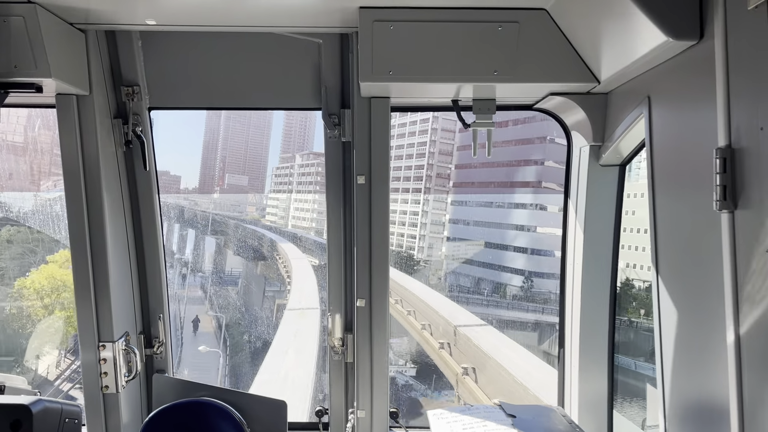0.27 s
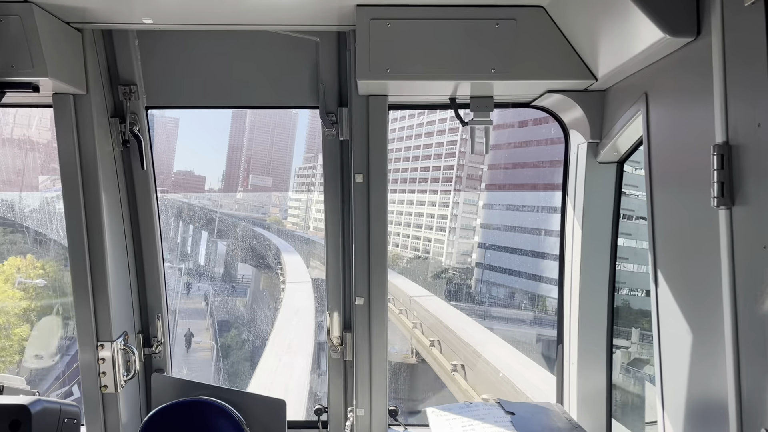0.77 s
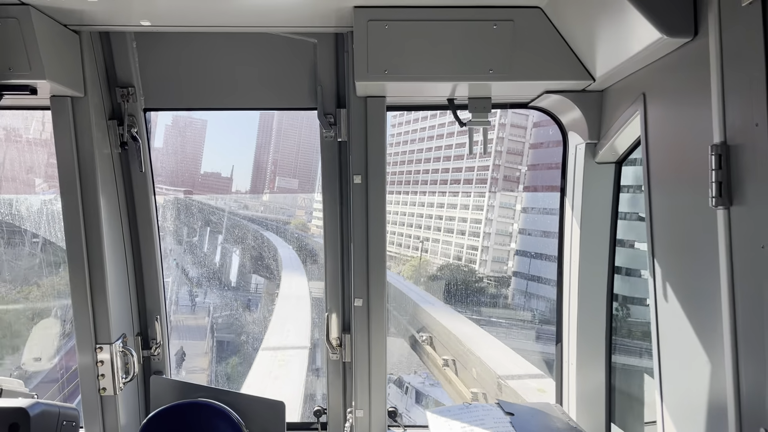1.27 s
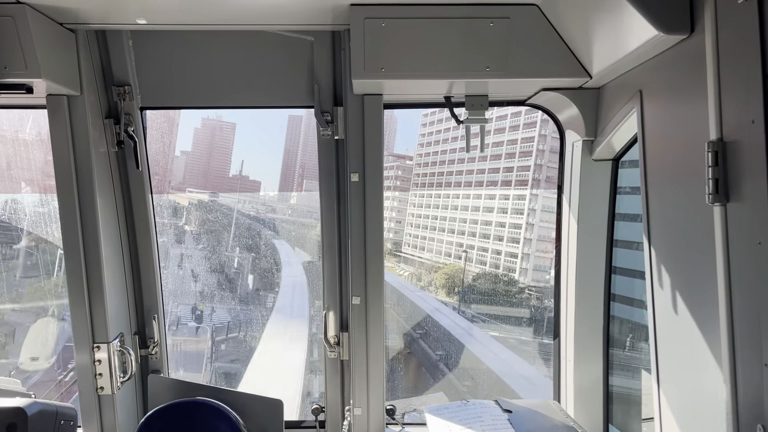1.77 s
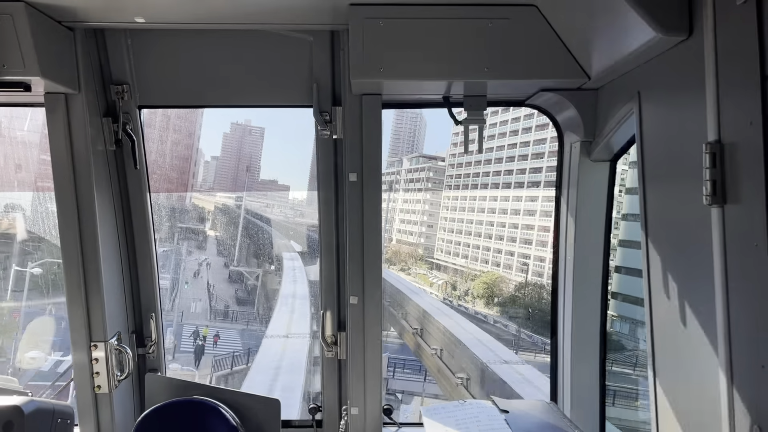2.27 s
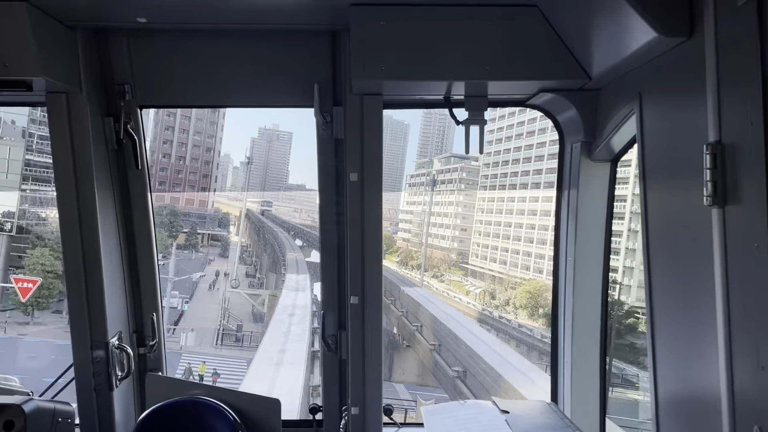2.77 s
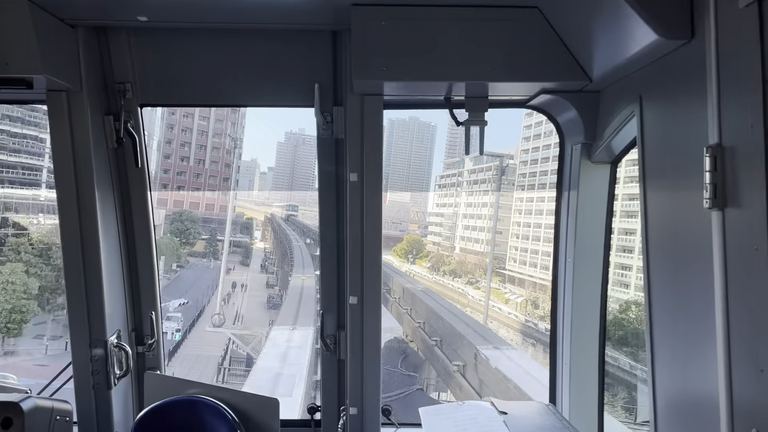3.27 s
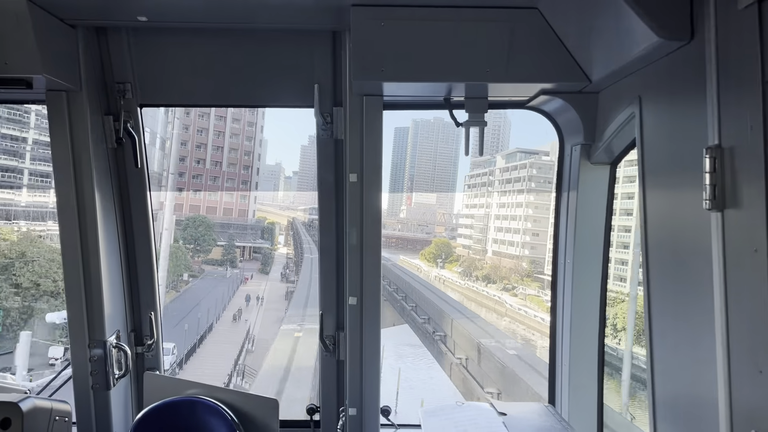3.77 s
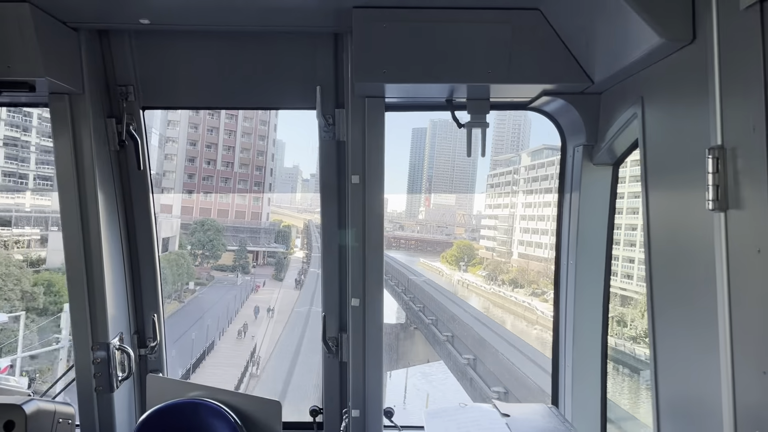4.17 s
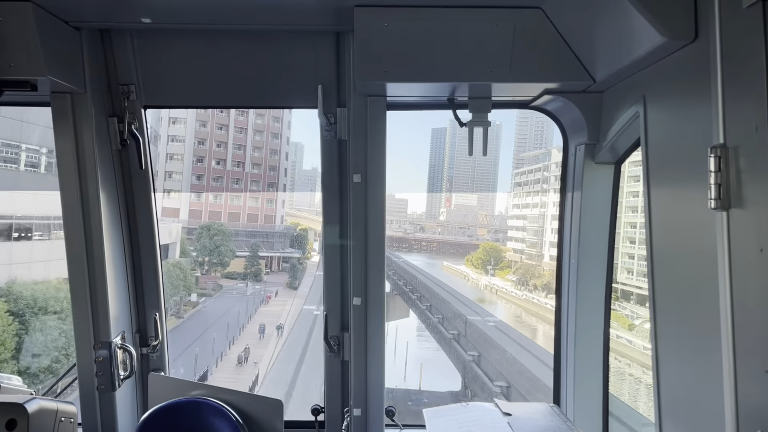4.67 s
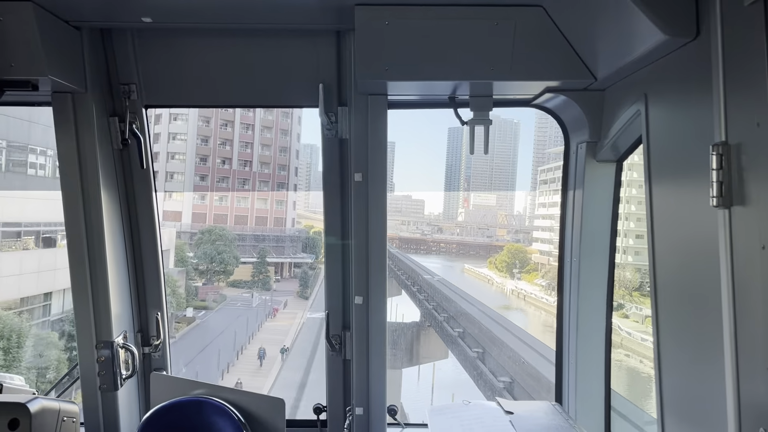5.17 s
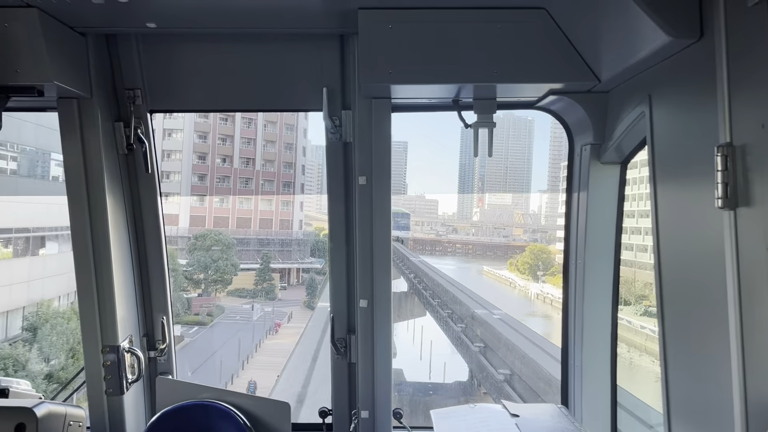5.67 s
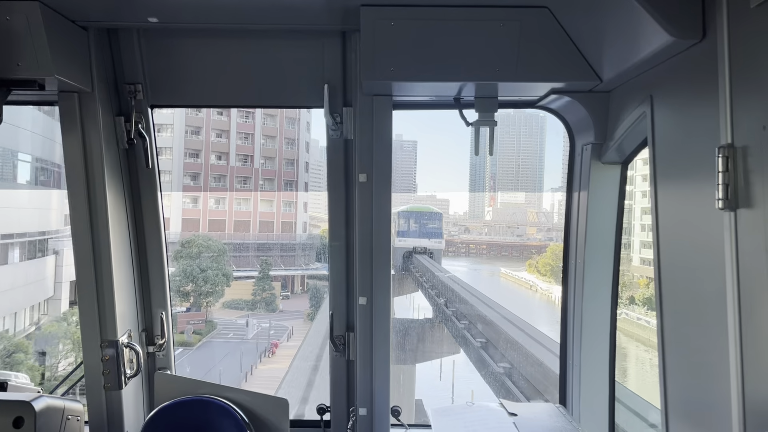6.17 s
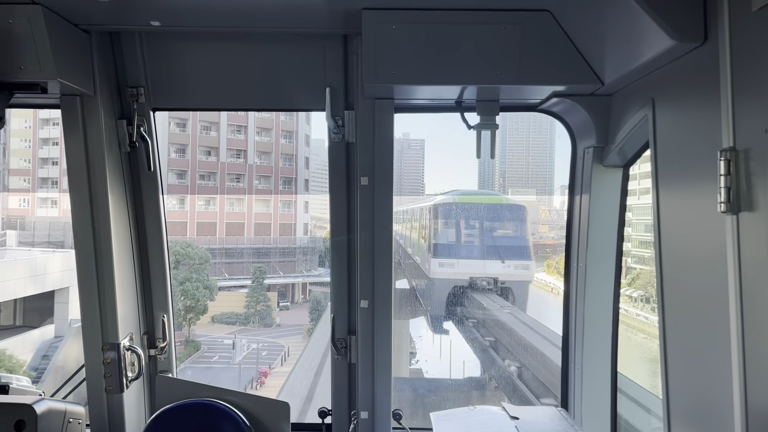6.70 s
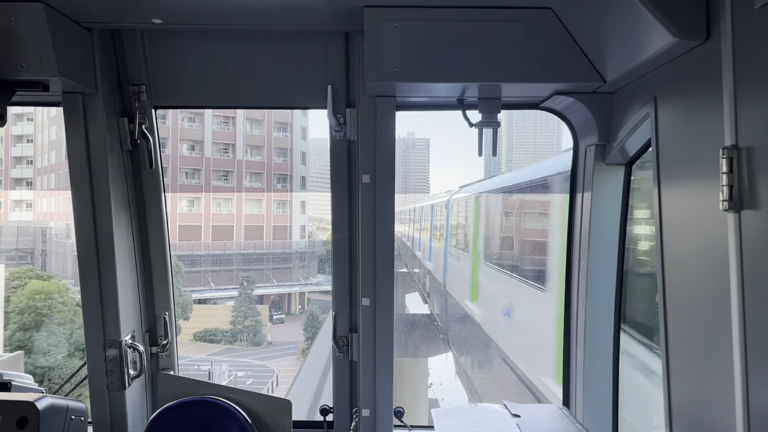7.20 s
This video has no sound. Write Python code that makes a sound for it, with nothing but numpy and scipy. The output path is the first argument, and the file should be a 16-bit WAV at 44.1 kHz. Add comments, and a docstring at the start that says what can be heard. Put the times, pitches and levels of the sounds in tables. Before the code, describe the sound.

Inside the front cab of a monorail, a deep throbbing hum and tyre rumble continue while a loose door knocks and small fittings tick.

```python
"""Inside the front of a monorail car running along its elevated beam.
The body hums and throbs near 85 Hz (phase-wandering tone plus tyre orders) over shaped-noise rumble and roar.
The tyres slap across a beam joint about once a second and roar more from halfway on, on coarser concrete.
Jolts bump the wall panels (short decaying sines) and make a loose cab door rattle and knock (ringing modes).
Small fittings tick (noise grains) and trim squeaks (gliding sines)."""
import sys
import numpy as np
from scipy import signal
from scipy.fft import rfft, irfft
from scipy.io import wavfile

SR = 44100
rng = np.random.default_rng(int(sys.argv[2]) if len(sys.argv) > 2 else 0)


def wav_out(sig):
    """Save sig, one row per channel (or a flat mono array), as 16-bit PCM at SR to the path in sys.argv[1]."""
    wavfile.write(sys.argv[1], SR, np.round(np.clip(np.atleast_2d(sig).T, -1, 1) * 32767).astype(np.int16))


N = 328104
TIME, BINS = np.arange(N) / SR, np.fft.rfftfreq(N, 1 / SR)  # s, Hz

# Tyre roar spectrum, also tilting the faint panel bumps. Each row: frequency in Hz, relative level in dB.
ROAR_SPECTRUM = [(120, -20.5), (200, 2.5), (300, -2.5), (380, -4.5), (440, -7), (600, -3.5), (760, -10),
                 (880, -16.5), (1200, -27.5), (1600, -31.5), (2200, -35.5), (4000, -63)]
# Spectrum of small loose parts: latch and fittings. Each row: frequency in Hz, relative level in dB.
RATTLE_SPECTRUM = [(400, -7), (800, 10), (2000, 16.5), (3000, 7), (4500, 3), (6500, 4), (9000, 2.5),
                   (10500, -0.5), (12500, -21.5), (14000, -36)]
# Tyres on beam joints. Each row: time in seconds, slap level in dB, undercarriage shake level in dB.
BEAM_JOINTS = [(0.027, -31, -23.5), (1.083, -33.5, -21), (1.856, -35, -25.5), (2.901, -29, -25.5),
               (3.936, -29.5, -19.5), (4.454, -29, -22), (5.49, -32.5, -25.5), (6.549, -35.5, -25)]


def amp(db):
    """Decibels to gain."""
    return 10 ** (np.asarray(db) / 20)


def unit(x):
    """Scales to rms 1."""
    return x / np.sqrt(np.mean(x ** 2) + 1e-20)


def curve(rows, column):
    """One column of a time table at every sample."""
    rows = np.array(rows)
    return np.interp(TIME, rows[:, 0], rows[:, column])


def shape(rows, hz, column=1):
    """One column of a frequency table, joined on a log axis."""
    rows = np.array(rows)
    return np.interp(np.log(hz + 1), np.log(rows[:, 0] + 1), rows[:, column])


def noise(db):
    """Two unrelated noises of one spectrum: the direct and the diffuse sound."""
    spectra = rfft(rng.standard_normal((2, N))) * amp(db)
    return unit(irfft(spectra, N))


def drift(rate_hz):
    """Slow random wander of rms 1, low-passed near rate_hz."""
    spectrum = rfft(rng.standard_normal(N))
    return unit(irfft(spectrum / (1 + (BINS / rate_hz) ** 4), N))


def burst(start_s, rise_s, decay_s, hold_s=0):
    """An envelope that swells from start_s, may hold, and dies away."""
    age = np.maximum(TIME - start_s, 0)
    fall = np.exp(-np.clip((age - rise_s - hold_s) / decay_s, 0, 20))
    return np.minimum(age / rise_s, 1) * fall


def add(mix, start_s, sound):
    """Mixes a sound in at start_s."""
    part = mix[..., max(round(start_s * SR), 0):][..., :sound.shape[-1]]
    part += sound[..., :part.shape[-1]]


def cabin(x, wet_db, t60_s):
    """Direct and diffuse sound: the small cab adds a short tail of reflections."""
    t = np.arange(SR // 4) / SR
    tails = rng.standard_normal((2, len(t))) * amp(-60 * t / t60_s) * (t > .004)
    tails /= np.linalg.norm(tails[0])
    wet = signal.oaconvolve(x[None], tails, axes=1)[:, :N]
    return np.array([x + amp(wet_db) * wet[0], amp(-11.0) * wet[1]])


def coarse():
    """0 on the smooth concrete, 1 on the coarse."""
    from_s, over_s = 3.78, 0.65
    return np.clip((TIME - from_s) / over_s, 0, 1)


def roughness_db():
    """How hard the concrete drives the tyres."""
    # Surges and lulls. Each row: time in seconds, level change in dB.
    surges = [(0, 3), (.2, 1.5), (.33, 0.5), (1.5, 1), (2.1, 2), (2.83, -0.5), (2.95, 0.5), (3.7, 2),
              (4.3, 0.5), (5.45, 0), (5.77, -1), (6.3, 1), (7.43, 0)]
    coarse_change_db = 4.5
    return coarse_change_db * coarse() + curve(surges, 1)


def boom():
    """Turning tyres drive the body's low mode at one multiple of their rate; nearby multiples make it throb."""
    # Drone of the body mode. Each row: time in seconds, level in dB.
    drone_levels = [(0.0, -17), (0.1, -11), (0.56, -16.5), (0.62, -26), (0.7, -10), (0.93, -16),
                    (0.99, -24), (1.18, -11.5), (1.57, -15), (1.63, -23.5), (1.76, -16), (1.96, -19),
                    (2.03, -10.5), (2.19, -28.5), (2.4, -19.5), (2.56, -23), (2.65, -16.5), (3.06, -21.5),
                    (3.12, -14.5), (3.31, -21), (3.47, -11), (3.54, -28), (3.66, -12.5), (3.85, -13.5),
                    (3.97, -20.5), (4.39, -17), (4.47, -26.5), (4.76, -18.5), (4.8, -32.5), (4.92, -13.5),
                    (5.03, -20), (5.21, -17.5), (5.34, -34.5), (5.44, -11.5), (5.98, -13), (6.06, -24.5),
                    (6.13, -13), (6.97, -10), (7.14, -27.5), (7.2, -11), (7.33, -11), (7.43, -15)]
    # Weaker multiples of the turning rate. Each row: multiple, level in dB on the smooth concrete.
    tyre_orders = [(5, -32.5), (7, -26.5), (9, -25.5), (11, -33)]
    mode_hz, mode_width_hz, mode_order = 85.26, 8.9, 8
    coarse_orders_db, jostle_db = -2, -28.5
    phase = 2 * np.pi * mode_hz * TIME + 0.076 * drift(27) + 0.67 * drift(2.86)
    direct = np.sqrt(2) * (np.sin(phase) + amp(-29) * np.sin(3 * phase))
    diffuse = np.sqrt(2) * np.cos(phase + drift(6))
    drone = amp(curve(drone_levels, 1) + 0.9 * drift(18)) * np.array([direct, diffuse])
    for order, db in tyre_orders:
        turn = phase * order / mode_order + 1.24 * drift(2.9)
        level_db = db + coarse_orders_db * coarse() + 2.0 * drift(3)
        drone += amp(level_db) * np.sqrt(2) * np.array([np.sin(turn), np.cos(turn)])
    # the same mode jostled by the track
    resonance_db = -20 * np.log10(1 + (2 * (BINS - mode_hz) / mode_width_hz) ** 2)
    return drone + amp(jostle_db) * noise(resonance_db)


def rumble():
    """A deep, lumpy rumble, and undercarriage shaking: the suspension takes up each joint's jolt slowly."""
    # Deep rumble. Each row: time in seconds, level in dB.
    deep_levels = [(0, -19.5), (.63, -26.5), (.8, -21), (1.03, -24.5), (1.48, -15), (1.6, -19),
                   (2.9, -21.5), (3.3, -19.5), (5.15, -18), (5.4, -27.5), (5.6, -18), (6, -24.5),
                   (6.55, -21.5), (6.8, -17.5), (7.07, -29), (7.3, -16.5)]
    # Both spectra. Each row: frequency in Hz, relative level in dB.
    rumble_spectrum = [(15, -31), (30, -22), (40, -7.5), (47, 1), (54, 3.5), (64, 5), (78, 2), (96, 1),
                       (110, -7.5), (160, -17), (400, -67.5), (1500, -120)]
    shake_spectrum = [(60, -25.5), (98, 2), (110, -2), (121, 0.5), (135, -1), (160, -7), (220, -17.5),
                      (330, -12.5), (450, -25), (800, -78.5)]
    shake_db, coarse_shake_db = -23, -1.5
    rise_s, decay_s = 0.13, 0.087
    jolts = sum(amp(db) * burst(s, rise_s, decay_s) for s, _, db in BEAM_JOINTS)
    steady = amp(shake_db + coarse_shake_db * coarse())
    shake = noise(shape(shake_spectrum, BINS)) * (steady + jolts)
    return noise(shape(rumble_spectrum, BINS)) * amp(curve(deep_levels, 1)) + shake


def roar():
    """Tyre noise through resonant wall panels, lumpy on the concrete, with wind rush and hiss above it."""
    # Panel resonances. Each row: frequency in Hz, width in Hz, mean lift in dB.
    panel_modes = [(261, 17, 8), (304, 37, 3.5), (360, 21, 3), (392, 18, 2), (486, 11, 6.5), (567, 17, 2.5),
                   (758.5, 39, 8), (1001, 63, 7.5), (1390, 50, 7.5)]
    # Both spectra. Each row: frequency in Hz, relative level in dB.
    hiss_spectrum = [(1500, -16), (3000, 2.5), (4700, 2), (6200, 2.5), (8500, -1.5), (9700, 0),
                     (10800, -11.5), (12000, -25.5), (14000, -48.5)]
    rush_spectrum = [(600, -16), (1000, 6.5), (1400, 3), (1800, 2), (2300, -2), (2750, -12), (4000, -35),
                     (8000, -65.5)]
    panel_swell_db, panel_swell_hz = 2.0, 6.5  # each panel swells and fades on its own
    smooth_roar_db, wind_db = -32, -43.5
    smooth_hiss_db, coarse_hiss_db = -53, -2  # the second is the change on coarse concrete
    tyres = noise(shape(ROAR_SPECTRUM, BINS))
    spectrum = rfft(tyres)
    for hz, width_hz, lift_db in panel_modes:
        band = irfft(spectrum / (1 + (2 * (BINS - hz) / width_hz) ** 2), N)
        gain = amp(lift_db + panel_swell_db * drift(panel_swell_hz))
        tyres = tyres + band * (gain - 1)
    lumps_db = 0.98 * drift(24)
    tyres = tyres * amp(smooth_roar_db + roughness_db() + lumps_db)
    gusts_db = .5 * drift(0.93)
    hiss_db = smooth_hiss_db + coarse_hiss_db * coarse() + gusts_db + 0.68 * drift(30)
    hiss = noise(shape(hiss_spectrum, BINS)) * amp(hiss_db)
    wind = noise(shape(rush_spectrum, BINS)) * amp(wind_db + gusts_db + 1.4 * drift(27))
    return tyres + hiss + wind


def joints():
    """The plate at each beam joint rings as a tyre strikes it and dies away; a faint scuffing trails it."""
    # Joint plate modes. Each row: frequency in Hz, level in dB.
    plate_modes = [(1295, -3), (1375, -9.5), (1600, -6), (1830, -12)]
    # Slap noise. Each row: frequency in Hz, relative level in dB.
    slap_spectrum = [(700, -25), (1100, -9), (1300, 3), (1650, -1.5), (1900, -4), (2200, -7), (2500, -22),
                     (4000, -30.5), (8000, -56.5)]
    scuff_db, scuff_decay_s = -10.5, 0.055  # level relative to the slap
    slap = sum(amp(db) * burst(s, .005, 0.027, hold_s=0.013) for s, db, _ in BEAM_JOINTS)
    scuff = sum(amp(db + scuff_db) * burst(s, 0.16, scuff_decay_s) for s, db, _ in BEAM_JOINTS)
    ring = sum(amp(db) * np.exp(1j * (2 * np.pi * hz * TIME + .95 * drift(45))) for hz, db in plate_modes)
    grit = (amp(-8.5) * slap + scuff) * noise(shape(slap_spectrum, BINS))
    return slap * np.array([ring.real, ring.imag]) + grit


def door_ring(pitch_hz, free):
    """The door's modes after one blow, peak 1; they start sharp while it is pressed into its seal."""
    # Door modes. Each row: multiple of the lowest pitch, level in dB, full t60 in seconds.
    door_modes = [(1, 2, 0.13), (1.269, -14, 0.12), (1.55, -6.5, 0.1), (1.95, -10.5, 0.091),
                  (2.5, -15.5, 0.1), (2.95, -25.5, 0.088)]
    press_sharp, press_s = 0.23, 0.0053  # share by which it starts sharp, settling time
    t = np.arange(SR // 3) / SR
    turns = np.cumsum(pitch_hz * (1 + press_sharp * np.exp(-t / press_s))) / SR
    ring = np.zeros(len(t))
    for ratio, db, t60_s in door_modes:
        ring += amp(db - 60 * t / (t60_s * free)) * np.sin(2 * np.pi * ratio * turns)
    ring *= 1 - np.exp(-(t / 0.0024) ** 2)  # the rubber seal softens the blow
    return ring / abs(ring).max()


def clack():
    """The door frame's short, hard answer to a blow: a few cycles under an envelope of peak 1."""
    pitch_hz, peak_s = 567, 0.0029
    t = np.arange(SR // 3) / SR
    swell = (t / peak_s * np.exp(1 - t / peak_s)) ** 3
    return swell * np.sin(2 * np.pi * pitch_hz * t)


def door():
    """Latch chatters and door shudders in its seal as it starts to move; then it clacks and its panel rings."""
    # Knocks and rebounds. Each row: time in seconds, thud level in dB, clack level in dB before clack_trim_db,
    # rattle level in dB, rattle decay in seconds, lowest pitch in Hz once settled, ring length as a share of t60.
    knocks = [(0.237, -7, -16.5, -40, 0.0074, 298, 0.23), (1.124, -16, -15, -46, .013, 231, 0.86),
              (1.225, -11.5, -11.5, -32, 0.018, 302, 0.66), (1.244, -12, -22, -51, 0.017, 260.4, 0.75),
              (1.5, -12, -32.5, -45.5, 0.0088, 340, 0.55), (1.779, -10, -7, -39, 0.015, 252, 1.7),
              (2.028, -16, -9, -40.5, 0.024, 238, 0.5), (2.057, -16, -20.5, -50, .009, 249.5, 0.57),
              (2.123, -16.5, -22, -55, 0.01, 307, 0.69), (2.519, -5.5, -8.5, -36, 0.019, 251.5, .9),
              (3.017, -9, -13, -34, .04, 229, .6), (3.029, -6, -19.5, -53, 0.038, 256.7, 1.2),
              (3.222, -6, -19, -36, 0.029, 319, 0.58), (3.519, -13.5, -18, -45, 0.014, 229, 1.2),
              (3.641, -8, -6, -33, 0.03, 258, 1.7), (4.062, -14, -24.5, -50, 0.014, 370, .5),
              (5.14, -8.5, -26.5, -38.5, 0.01, 239.4, 0.46), (5.505, -13.5, -11, -43, 0.026, 241.6, 0.74),
              (5.516, -9, -9, -46, 0.024, 278, 1.2), (5.638, -5.5, -10, -36.5, 0.019, 254.8, 0.87)]
    # Seal shudder. Each row: frequency in Hz, relative level in dB.
    shudder_spectrum = [(200, -22), (330, 0), (430, 0.5), (690, -1.5), (880, -18), (1600, -46)]
    clack_trim_db = -2.5
    shudder_db, shudder_lead_s, shudder_decay_s = -16.5, 0.01, .022  # level relative to the thud
    blows, chatter, shudder = np.zeros(N), np.zeros(N), np.zeros(N)
    for s, thud_db, clack_db, rattle_db, decay_s, hz, free in knocks:
        add(blows, s, amp(thud_db) * door_ring(hz, free) + amp(clack_db + clack_trim_db) * clack())
        chatter += amp(rattle_db) * burst(s - .0075, 0.0092, decay_s)
        shudder += amp(thud_db + shudder_db) * burst(s - shudder_lead_s, shudder_lead_s, shudder_decay_s)
    contacts_db = 2.7 * drift(300)  # the latch touches unevenly
    rattle = noise(shape(RATTLE_SPECTRUM, BINS)) * chatter * amp(contacts_db)
    return cabin(blows, wet_db=-15, t60_s=0.06) + rattle + noise(shape(shudder_spectrum, BINS)) * shudder


def bump(db, hz, swell_s):
    """One panel flexes and rings for a few cycles, sagging in pitch."""
    t = np.arange(SR // 6) / SR
    phase = 2 * np.pi * np.cumsum(hz * (.98 + 0.047 * np.exp(-t / (2 * swell_s)))) / SR
    envelope = t / swell_s * np.exp(1 - t / swell_s)
    return amp(db) * envelope * (np.sin(phase) + amp(-18.5) * np.sin(1.47 * phase))


def panels():
    """Clear bumps of single wall panels, and a patter of faint ones that grows louder on rough concrete."""
    # Clear bumps. Each row: time in seconds, level in dB, nominal pitch in Hz, swell in seconds.
    clear_bumps = [(.074, -23, 517, 0.008), (1.604, -22, 408, 0.0044), (1.636, -22, 456, 0.0066),
                   (2.073, -20, 397, 0.0071), (2.301, -29, 807, 0.0049), (4.153, -18.5, 405, 0.0065),
                   (4.508, -18.5, 315, 0.0067), (4.615, -19, 435, 0.0039), (4.825, -14.5, 240, .006),
                   (5.025, -15, 318, 0.0064), (5.403, -24, 727, .004), (6.657, -19.5, 182, 0.0071),
                   (7.059, -19, 417, 0.0056), (7.29, -17.5, 160.7, 0.018)]
    faint_per_s, faint_db, faint_swell_s = 23, -37, 0.0071
    out, pitch_hz = np.zeros(N), 220 * 3.5 ** rng.random(N)
    level_db = faint_db + roughness_db() + rng.uniform(-5.0, 4, N)
    for s, db, hz, swell_s in clear_bumps:
        add(out, s, bump(db, hz, swell_s))
    for i in np.flatnonzero(rng.random(N) < faint_per_s / SR):
        db = level_db[i] + shape(ROAR_SPECTRUM, pitch_hz[i])
        add(out, i / SR, bump(db, pitch_hz[i], faint_swell_s))
    return cabin(out, wet_db=-9.5, t60_s=0.031)


def ticks():
    """Small fittings click: decaying noise grains, each in its own broad band."""
    # Each row: time in seconds, level in dB, decay in seconds, band centre in Hz before the rattle colour.
    tick_rows = [(0.197, -34.5, 0.0043, 2970), (.2355, -23, 0.0011, 7000), (1.106, -31.5, 0.0023, 5000),
                 (1.1254, -37, .002, 4000), (1.336, -39, 0.0033, 4000), (1.5023, -35, 0.0026, 5000),
                 (1.638, -37, 0.0026, 3800), (2.058, -41, .002, 4000), (2.120, -33, 0.0042, 2200),
                 (4.058, -34.5, .004, 3480), (4.886, -40.5, .004, 4000), (5.041, -41.5, 0.012, 3500),
                 (6.703, -46, 0.031, 6040), (6.936, -41, 0.005, 3500), (7.225, -35.5, 0.027, 1890),
                 (7.265, -31.5, 0.019, 1500), (7.284, -46, 0.016, 8050)]
    t, out = np.arange(SR // 5) / SR, np.zeros((2, N))
    hz = np.fft.rfftfreq(len(t), 1 / SR) + 1
    for s, db, decay_s, pitch_hz in tick_rows:
        colour = amp(shape(RATTLE_SPECTRUM, hz) - 2.4 * np.log2(hz / pitch_hz) ** 2)
        grain = unit(irfft(rfft(rng.standard_normal((2, len(t)))) * colour, len(t)))
        envelope = np.minimum(t / (0.053 * decay_s), 1) * np.exp(-t / decay_s)
        add(out, s, amp(db) * grain * envelope)
    return out


def squeaks():
    """Trim rubs on trim: short, thin whistles that catch quickly, glide and fade."""
    # Each row: time in seconds, length in seconds, pitch in Hz, glide in Hz, rms waver in Hz, level in dB.
    squeak_rows = [(1.47, .05, 7200, -100, 70, -54), (2.828, 0.065, 5970, -30, 45, -48.5),
                   (3.061, 0.024, 5920, 0, 25, -41), (3.09, .03, 5890, -40, 45, -48),
                   (3.261, 0.04, 990, -5, 5, -32.5), (3.358, 0.041, 995, 7, 5, -37),
                   (4.107, .06, 4600, -39, 40, -61), (4.24, 0.06, 4520, -20, 22, -58),
                   (6.093, .05, 1030, -19, 20, -38.5), (6.63, 0.11, 10600, 0, 450, -56.5),
                   (6.867, 0.09, 10020, -87, 55, -52.5)]
    out, waver, uneven = np.zeros((2, N)), drift(220), drift(90)
    for s, length_s, hz, glide_hz, waver_hz, db in squeak_rows:
        u = np.linspace(0, 1, int(length_s * SR))
        now = int(s * SR) + np.arange(len(u))
        phase = 2 * np.pi * np.cumsum(hz + waver_hz * waver[now] + glide_hz * u) / SR
        whistle = np.sqrt(2) * np.array([np.sin(phase), np.cos(phase)])
        grip = amp(2.4 * uneven[now])  # the surfaces grip unevenly
        envelope = np.minimum(u / 0.11, 1) * (1 - u) ** 0.47
        add(out, s, amp(db) * whistle * grip * envelope)
    return out


def ports(direct, diffuse):
    """Two close microphone ports: alike in the bass, apart in the middle, opposed at one treble pitch."""
    # Each row: frequency in Hz, side level in dB, share of side that follows mid (0-1), its phase in radians.
    port_rows = [(45, -34, .3, 6.5), (85, -22.5, .87, -0.7), (125, -12.5, .3, 1.5), (260, -12, .8, 1.1),
                 (360, -12.5, .75, 1.3), (600, -2, 0.5, 1), (950, 0, .15, 1), (1450, 1, .28, 2.5),
                 (1900, -7, .65, 1.2), (3200, -3, .5, 1.1), (5000, -7.5, .55, 0), (6300, -5, .8, -1.4),
                 (10200, -2.5, .8, -1.5), (11100, -16.5, .3, -1.5)]
    notch_hz, notch_half_width_hz = 8370, 2630  # mid vanishes here and changes sign above
    mid, other = rfft(direct), rfft(diffuse)
    share = np.clip(shape(port_rows, BINS, column=2), 0, 1)
    turn = np.exp(1j * shape(port_rows, BINS, column=3))
    side = amp(shape(port_rows, BINS)) * (share * turn * mid + np.sqrt(1 - share ** 2) * other)
    mid = mid * (notch_hz - BINS) / np.hypot(notch_hz - BINS, notch_half_width_hz)
    return irfft(np.array([mid + side, mid - side]), N)


def scene():
    """Everything in the cab, eased in and out over a few milliseconds and picked up by the two ports."""
    cab = boom() + rumble() + roar() + joints() + door() + panels() + ticks() + squeaks()
    ease = signal.windows.tukey(N, .0012)
    return ports(*(cab * ease))


def record(dry):
    """Peaks are rounded just under full scale; then the band limit."""
    edge_hz = 13900
    held = dry / (1 + dry ** 10) ** (1 / 10)
    lowpass = signal.firwin(511, edge_hz, window=("kaiser", 9), fs=SR)
    return signal.oaconvolve(held, lowpass[None], "same")


dry = scene()
out = record(dry)
wav_out(out)
```